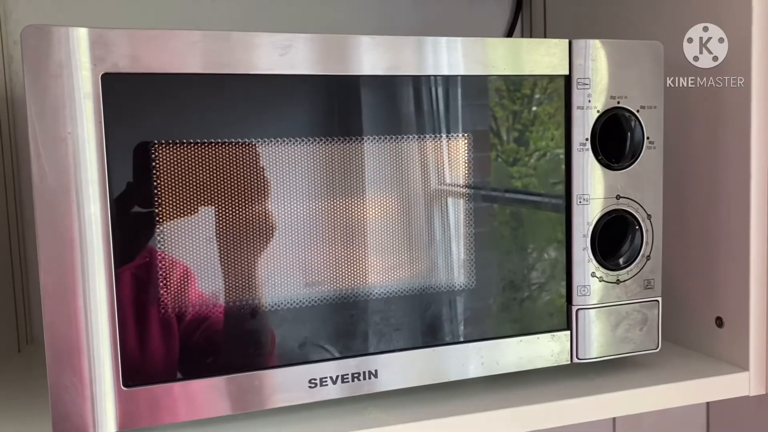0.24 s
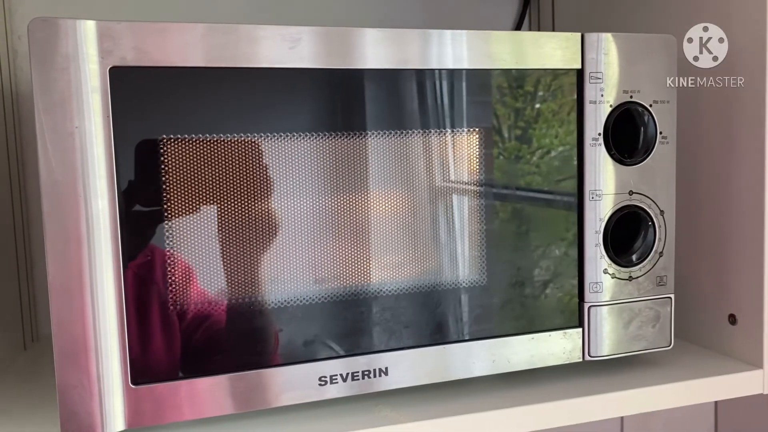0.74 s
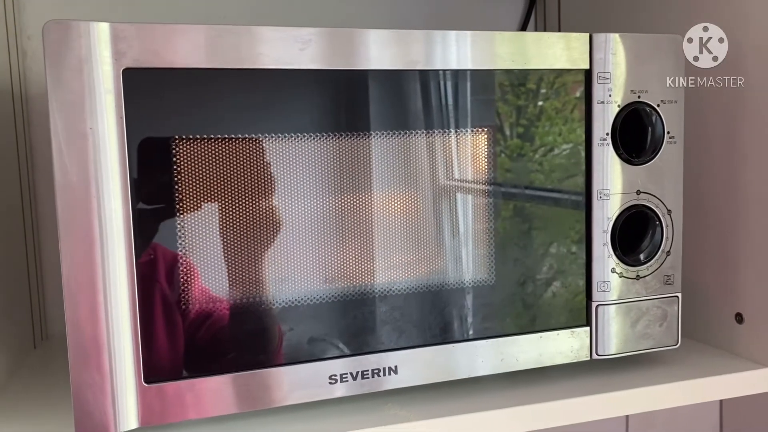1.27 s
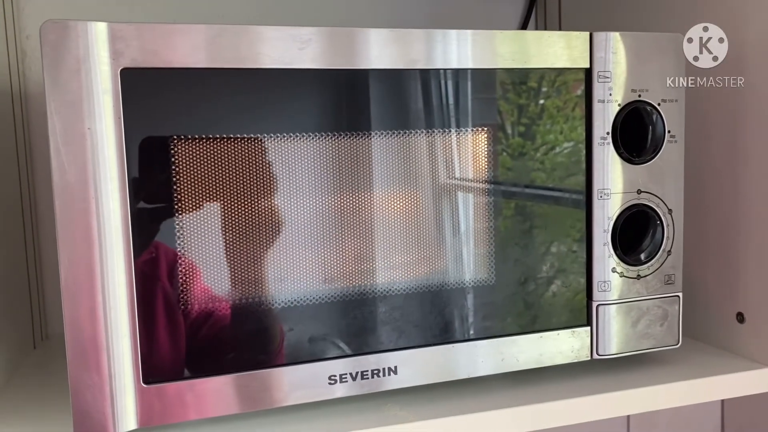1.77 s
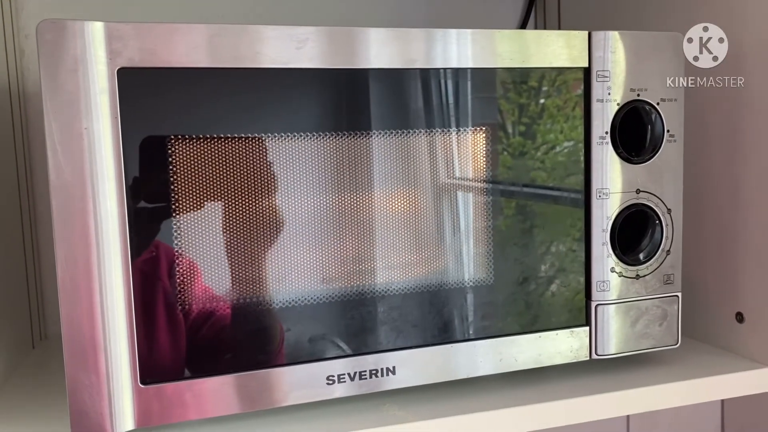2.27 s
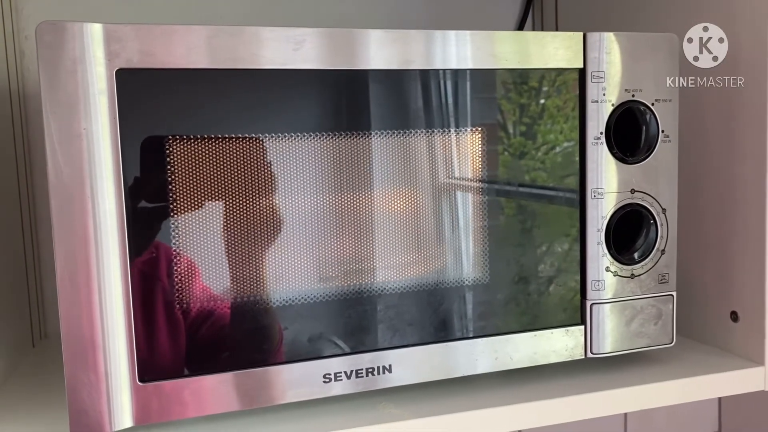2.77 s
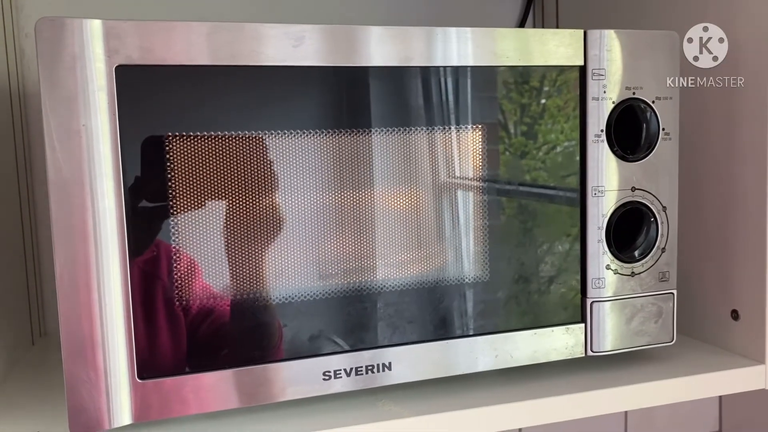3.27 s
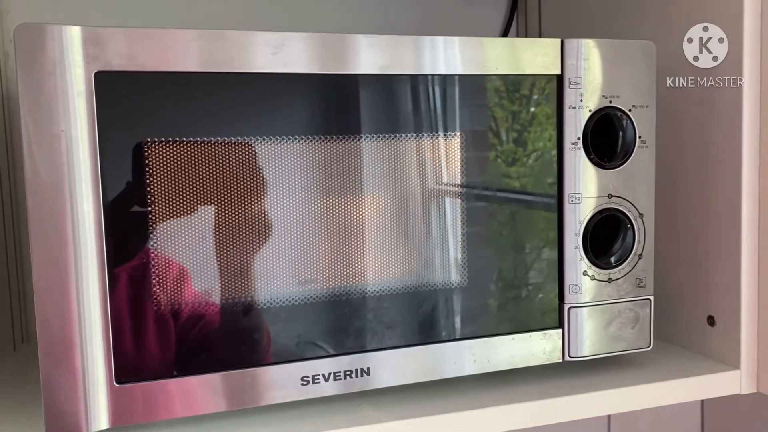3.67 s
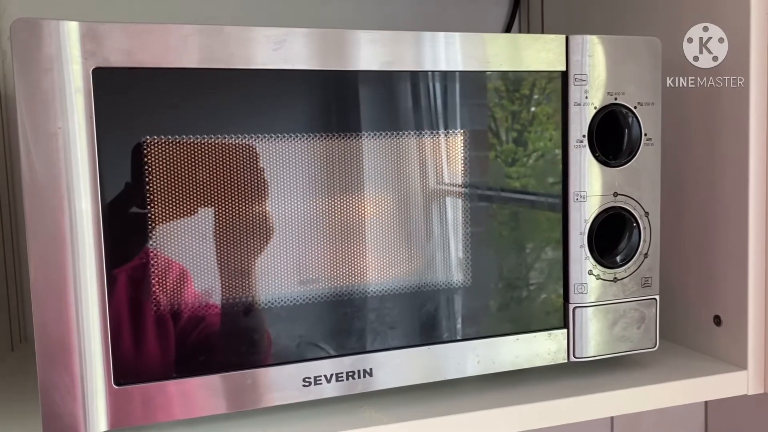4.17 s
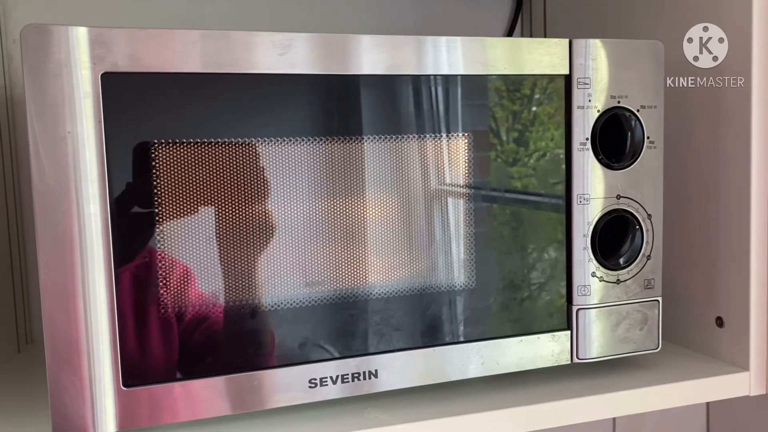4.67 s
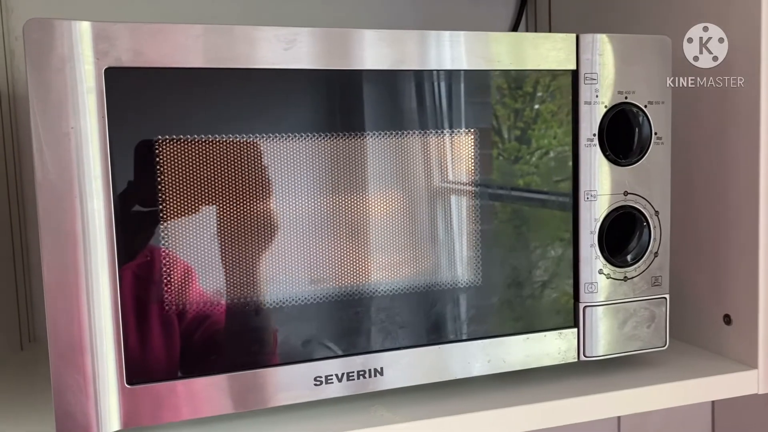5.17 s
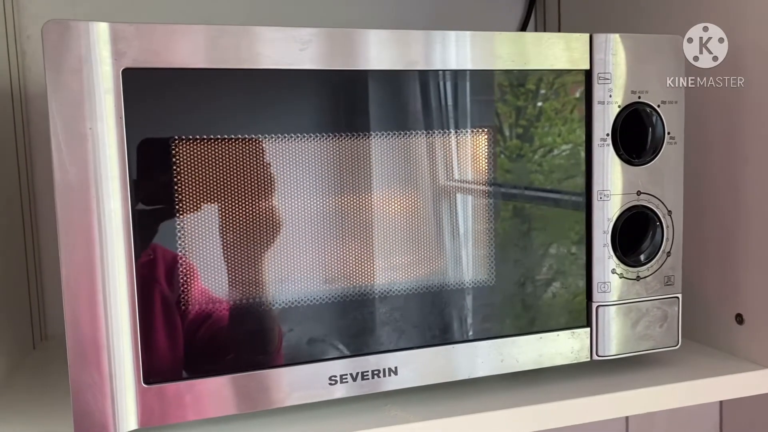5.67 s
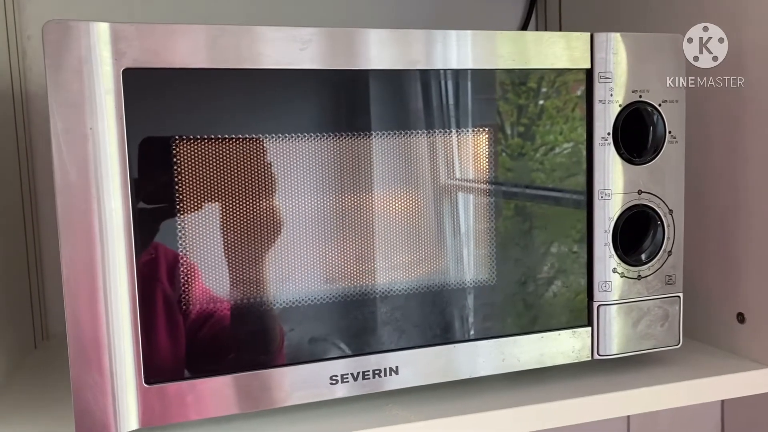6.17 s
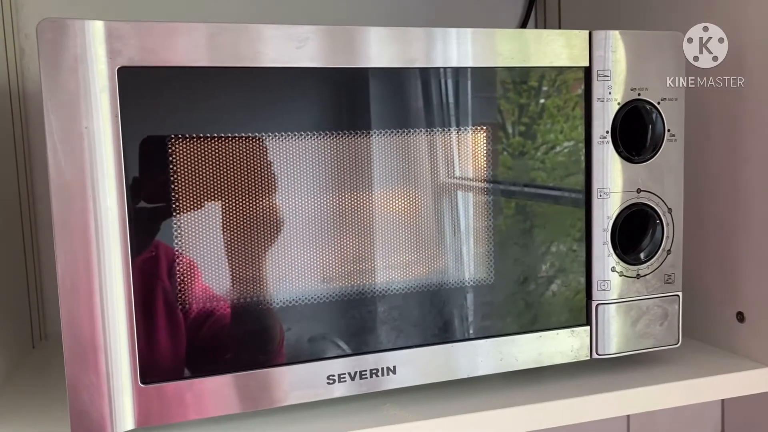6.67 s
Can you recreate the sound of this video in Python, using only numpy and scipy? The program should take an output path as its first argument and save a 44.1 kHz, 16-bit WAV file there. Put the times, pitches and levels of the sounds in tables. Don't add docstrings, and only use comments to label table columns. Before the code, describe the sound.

A microwave oven is already running at 0 s, close to a handheld stereo microphone in a kitchen. Its fan gives a steady low hum around 167 Hz with weaker overtones, wrapped in broad, mostly low and middle-pitched rushing air that rings hollowly in the metal case. Underneath, a 100 Hz transformer buzz throbs about three times a second. A faint dry tick falls at 0.2 s; just after 1 s the buzz weakens slightly, and a tiny high squeak comes at 1.5 s. A fainter tick is nearly buried at 2.8 s. At 3.2 s everything fades fast, cuts to near silence for a moment, and swells back by 3.5 s with soft, deep handling thuds until about 4.3 s. From 4.6 s the opening stretch repeats, tick at 4.7 s, squeak near 6.1 s, and the drone continues to the end without the oven stopping.

```python
import sys
import numpy as np
from scipy import signal
from scipy.fft import rfft, irfft
from scipy.io import wavfile
from scipy.ndimage import uniform_filter1d

SR = 44100
rng = np.random.default_rng(int(sys.argv[2]) if len(sys.argv) > 2 else 0)


def master(y):
    cut = np.clip(np.atleast_2d(y).T, -1, 1)
    pcm = np.round(cut * 32767)
    wavfile.write(sys.argv[1], SR, pcm.astype(np.int16))


def attenuation_scalar(level_db):
    decades = np.asarray(level_db, float) / 20
    return 10 ** decades


N = 305172

LOOP = 201728
JOINT = 148600
TIME = np.arange(LOOP) / SR
HZ = np.fft.rfftfreq(LOOP, 1 / SR)

# (time [s], blade rate [Hz])
BLADE_RATE = [
    (0, 167.46),
    (1.0, 167.5),
    (1.6, 167.38),
    (3.3, 167.42),
    (3.42, 167.2),
    (4.2, 167.3),
    (4.58, 167.46),
]
# (frequency [Hz], right lead [rad])
PORT_PHASE = [(60, 0), (800, .2), (1080, 1.3), (1500, 0), (2900, -.5), (3700, .1), (4700, -.3),
              (5300, -1.6), (6300, -.3), (7200, .2), (9150, 3.14), (11100, 6.4), (13000, 9.42),
              (14300, 12.3), (15400, 14.5)]


def read(points, hz):
    f, value = np.transpose(points)
    return np.interp(np.log(hz + 1), np.log(f + 1), value)


def coloured(gain):
    x = irfft(gain * rfft(rng.standard_normal(LOOP)), LOOP)
    return x / np.sqrt(np.mean(x ** 2))


def bell(hz, width):
    return 1 / (1 + ((HZ - hz) / width) ** 2 * 4) ** 2


def angle(rate):
    from_joint = np.cumsum(np.roll(rate, -JOINT))
    return np.roll(2 * np.pi * from_joint / SR, JOINT)


def blade_angle():
    s, rate_hz = np.transpose(BLADE_RATE)
    return angle(np.interp(TIME, s, rate_hz))


def swell(start_s, rise_s, t60_s):
    rise = np.clip((TIME - start_s) / rise_s, 0, 1)
    return rise * attenuation_scalar(-60 * np.maximum(TIME - start_s - rise_s, 0) / t60_s)


def floor_rumble():
    lumps = attenuation_scalar(2 * coloured(bell(0, 6.6)))
    upper = attenuation_scalar(-67) * coloured(bell(51, 24.))
    deepest = attenuation_scalar(-78) * coloured(bell(34, 24.))
    return lumps * (upper + deepest)


def thuds():
    # (time [s], level [dB], pitch [Hz])
    bumps = [
        (3.49, -46.5, 50.3),
        (3.7, -55, 55),
        (3.98, -52, 51.6),
        (4.28, -54, 49.4),
        (.64, -56, 50),
        (1.12, -54, 54.7),
        (2.74, -57, 49.7),
    ]
    out = np.zeros(LOOP)
    for s, db, hz in bumps:
        shape = swell(s, rise_s=0.045, t60_s=.6)
        out += np.sqrt(2) * attenuation_scalar(db) * shape * np.sin(2 * np.pi * hz * (TIME - s))
    return out


def ticks():
    # (time [s], level [dB], frequency [Hz], width [Hz], rise [s], t60 [s])
    small_noises = [
        (.174, -57, 10000, 11000, .002, 0.054),
        (1.548, -67.5, 7670, 60, 0.023, 0.061),
        (2.79, -76, 10000, 7000, .003, .04),
    ]
    left = np.zeros(LOOP)
    for s, db, hz, width, rise, t60 in small_noises:
        left += attenuation_scalar(db) * swell(s, rise, t60) * coloured(np.sqrt(bell(hz, width)))
    right = irfft(rfft(left) * np.exp(1j * read(PORT_PHASE, HZ)), LOOP)
    return np.array([left, right])


def shaft_tone():
    return np.sqrt(2) * attenuation_scalar(-61.5) * np.cos(3 / 4 * blade_angle())


def transformer_buzz():
    beat_hz, beat_depth, beat_top_s = 3.05, 0.41, 0.924
    shift_s, shift_length_s, shift_db = 1.04, 0.28, -6
    joint_s, turn_s = JOINT / SR, LOOP / SR
    since_joint = (TIME - joint_s) % turn_s
    top_since_joint = (beat_top_s - joint_s) % turn_s
    beat = 1 + beat_depth * np.cos(2 * np.pi * beat_hz * (since_joint - top_since_joint))
    shift = np.clip((TIME - shift_s) / shift_length_s, 0, 1) * (TIME < joint_s)
    mains = angle(np.full(LOOP, 100.02))
    first = attenuation_scalar(-53 + shift_db * shift) * beat * np.cos(mains)
    third = attenuation_scalar(-63) * np.cos(3 * mains)
    return np.sqrt(2) * (first + third)


def air():
    # (frequency [Hz], density [dB per Hz])
    stream = [(28, -39), (48, -23), (80, -10), (150, -9), (370, -9), (700, -9.5), (1100, -13), (2000, -20),
              (3200, -26.5), (5000, -33), (8000, -44), (11000, -51.5), (14300, -63), (14900, -68),
              (17000, -80)]
    # (frequency [Hz], width [Hz], density [dB per Hz])
    resonances = [(134, 25, -6.5), (207.6, 12, 1.5), (225.9, 19.3, 3), (264.6, 10.3, 1.5), (299.4, 9, -4.5),
                  (400, 45, -8), (435, 24, -4.5), (534, 82, -3.5), (570, 25, -6.5), (608, 59, -0.5),
                  (694, 35, -11.5), (760, 17, -26), (793, 18, -6.5), (869, 32.4, 1), (897.4, 67, -4.5),
                  (1008, 55, -6.5), (1148, 91, -11), (1270, 34, -30), (1397, 38, -12.5), (1600, 42, -15),
                  (1622, 61, -14.5), (1696, 39, -8.5), (1760, 34, -15), (2190, 70, -25), (2217, 56, -19),
                  (2387, 155, -18.5), (2639, 68, -20), (3120, 49, -27), (3600, 170, -32.5),
                  (6600, 420, -38)]
    # (frequency [Hz], width [Hz], depth [dB])
    echo_dips = [(264, 11, 3), (815, 24, 14), (1029, 28, 9), (1274, 32, 3), (458, 21, 6.5), (2320, 45, 4)]
    # (frequency [Hz], left-right likeness [0-1])
    likeness = [(60, 0.95), (270, 1), (600, 0.83), (1150, 0.7), (1400, 0.39), (2050, 0.27), (2700, 0.64),
                (3900, 0.85), (4600, 0.091), (5800, 0.45), (6400, 1), (12000, 0.99)]
    # (frequency [Hz], left minus right [dB])
    left_lean = [(60, -6.5), (120, 4), (240, 2.5), (470, 0.5), (930, 0.5), (1850, 2), (3680, 3), (7320, 2),
                 (14500, -3)]

    power = attenuation_scalar(2 * read(stream, HZ))
    for hz, width, db in resonances:
        power += attenuation_scalar(2 * db) * bell(hz, width)
    dip_db = sum(db * bell(hz, width) for hz, width, db in echo_dips)
    gain = np.sqrt(power) * attenuation_scalar(-dip_db)

    same = np.clip(read(likeness, HZ), -1, 1)
    private = np.sqrt(1 - same ** 2)
    a, b = rfft(rng.standard_normal((2, LOOP)))
    right = (same * a + private * b) * np.exp(1j * read(PORT_PHASE, HZ))
    pair = np.array([a, right])

    ripple = rng.standard_normal((2, len(HZ)))
    for _ in range(2):
        ripple = uniform_filter1d(ripple, size=130)
    ripple[1] = same * ripple[0] + private * ripple[1]
    ripple_db = 2.2 * ripple / ripple.std() * np.clip(HZ / 1500 - 1, .25, 1)
    lean_db = np.outer([.5, -.5], read(left_lean, HZ))
    x = irfft(pair * gain * attenuation_scalar(ripple_db + lean_db), LOOP)
    gusts = attenuation_scalar(0.45 * coloured(bell(0, 42.0)))
    return attenuation_scalar(-40.5) * gusts * x / np.sqrt(np.mean(x ** 2))


def blade_hum():
    # (multiple, left level [dB], right level [dB], left lag [rad], waver [dB])
    blade_tones = [
        (1, -34.5, -37.5, 0.33, -0.2),
        (2, -40.3, -41.5, 0.17, 4.5),
        (3, -53, -58.5, 1, 1.5),
        (4, -52, -70, 0.25, 10),
        (7, -74, -51.5, 0.23, 4),
        (8, -88, -60.5, .5, 2.0),
        (9, -79, -62, 0.054, 5.5),
    ]
    turn, out = blade_angle(), np.zeros((2, LOOP))
    for multiple, left_db, right_db, lag, waver_db in blade_tones:
        k = round(multiple)
        waver = attenuation_scalar(min(waver_db, 1.5) * coloured(bell(0, 1.7)))
        phase = k * turn + 2.55 * (k - 1)
        out[0] += attenuation_scalar(left_db) * waver * np.cos(phase - lag / 2)
        out[1] += attenuation_scalar(right_db) * waver * np.cos(phase + lag / 2)
    return out


def fade():
    out_s, cut_s, trace_end_s, resume_s = 3.232, 3.3337, 3.352, 3.404
    fade_length_s = .14
    bend = 1.28
    out = np.clip(1 - (TIME - out_s) / fade_length_s, 0, 1) ** bend * (TIME < cut_s)
    trace = np.where(TIME < trace_end_s, attenuation_scalar(-48), attenuation_scalar(-93))
    trace = trace * (TIME >= cut_s) * (TIME < resume_s)
    back = np.clip(.13 + (TIME - resume_s) / fade_length_s, 0, 1) ** bend * (TIME >= resume_s)
    return uniform_filter1d(out + trace + back, size=44, mode="wrap")


def scene():
    low = floor_rumble() + thuds() + shaft_tone() + transformer_buzz()
    turn = (low + ticks() + air() + blade_hum()) * fade()
    onset = np.minimum(np.arange(N) / SR / .002, 1)
    return np.tile(turn, 2)[:, :N] * onset


def top_cut(x):
    return signal.sosfilt(signal.butter(12, 15130, fs=SR, output="sos"), x)


def record(dry):
    return top_cut(dry)


dry = scene()
out = record(dry)
master(out)
```